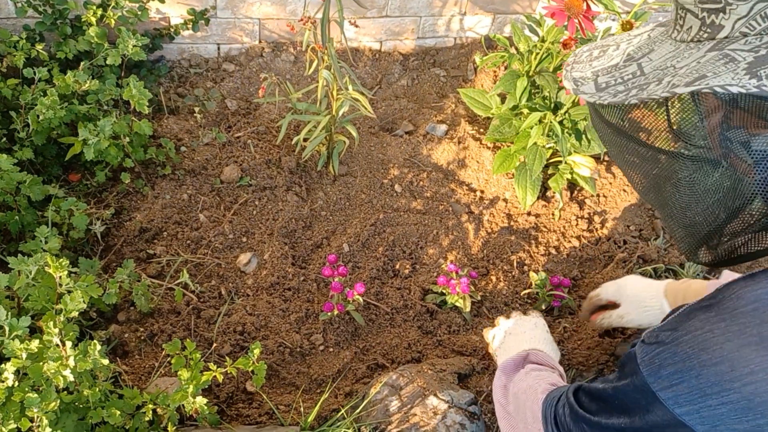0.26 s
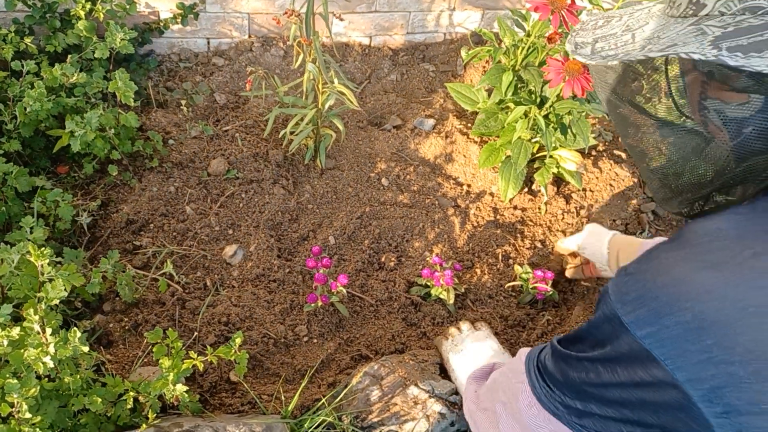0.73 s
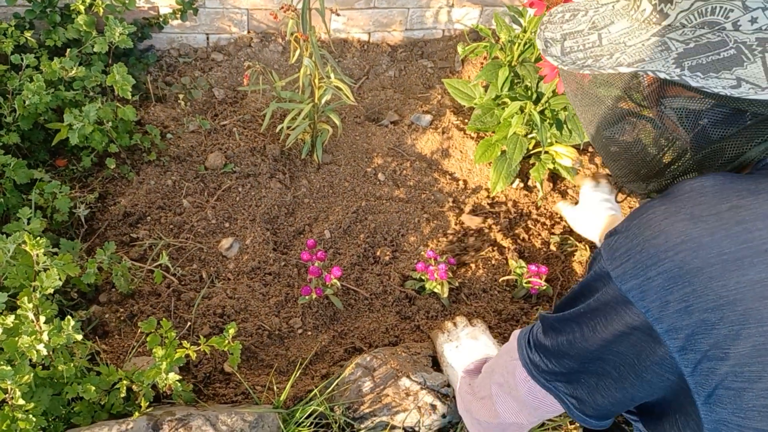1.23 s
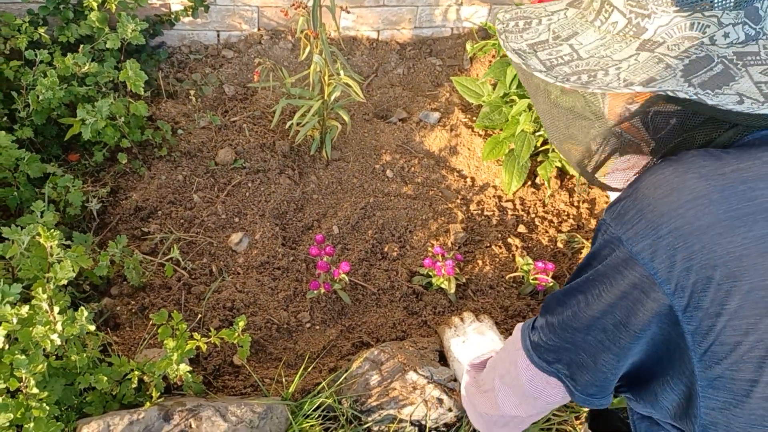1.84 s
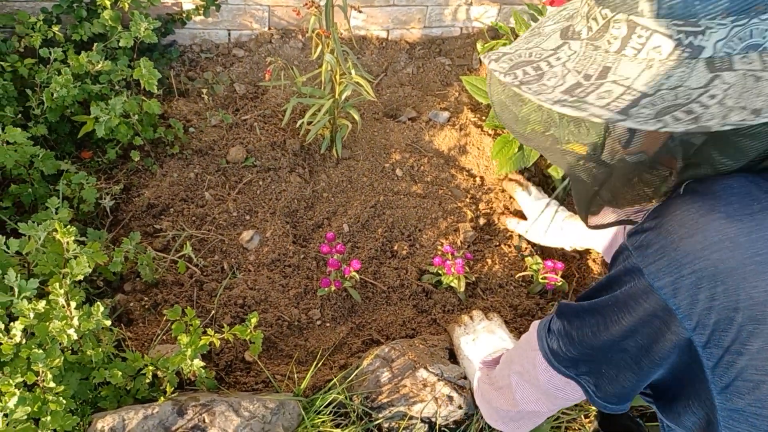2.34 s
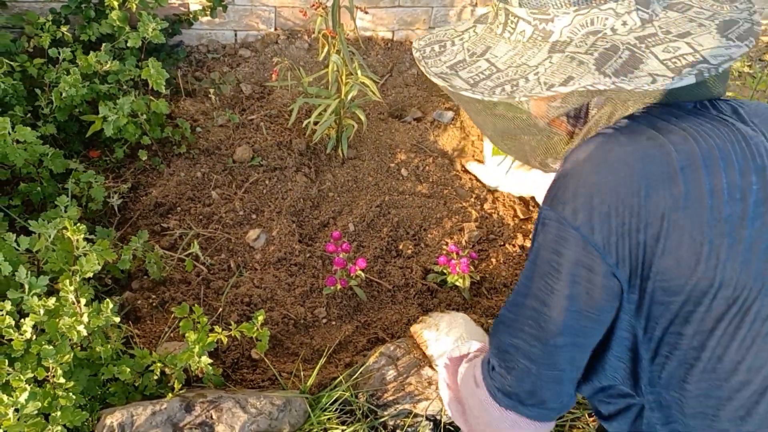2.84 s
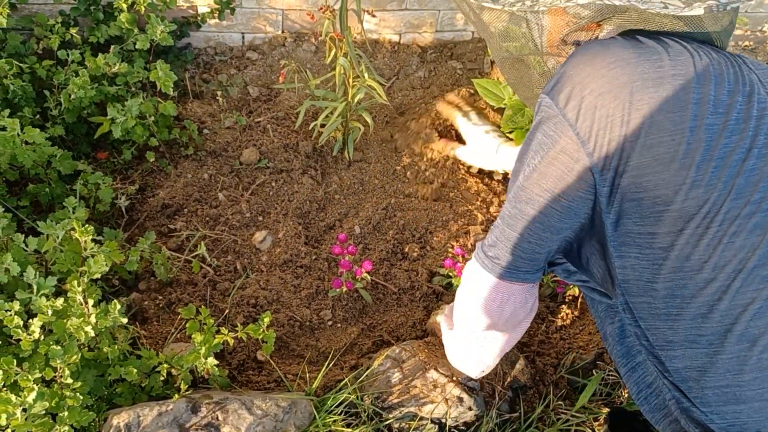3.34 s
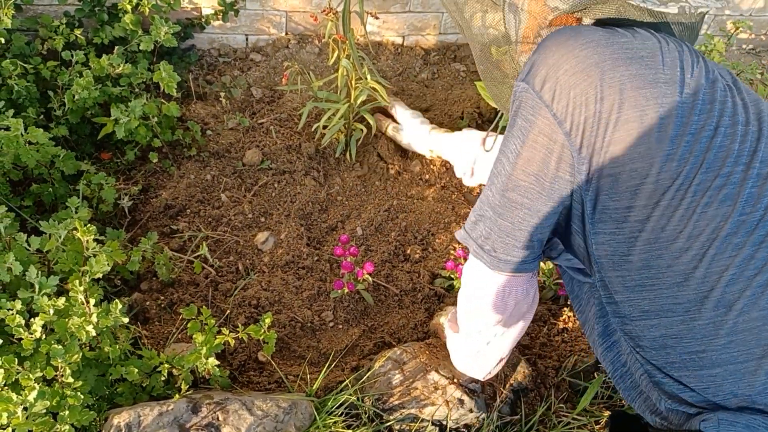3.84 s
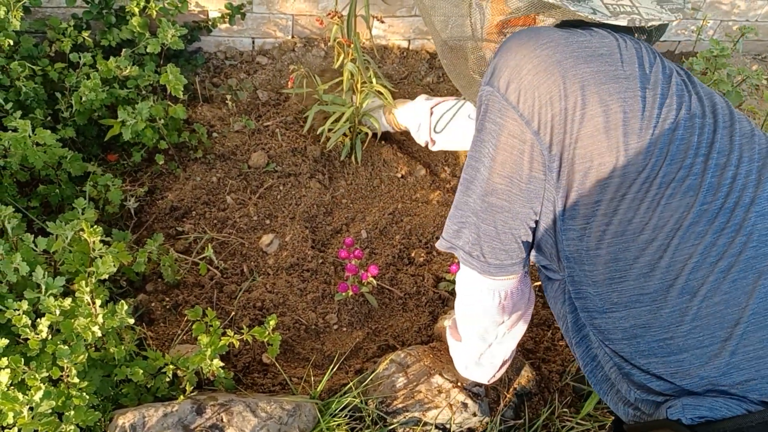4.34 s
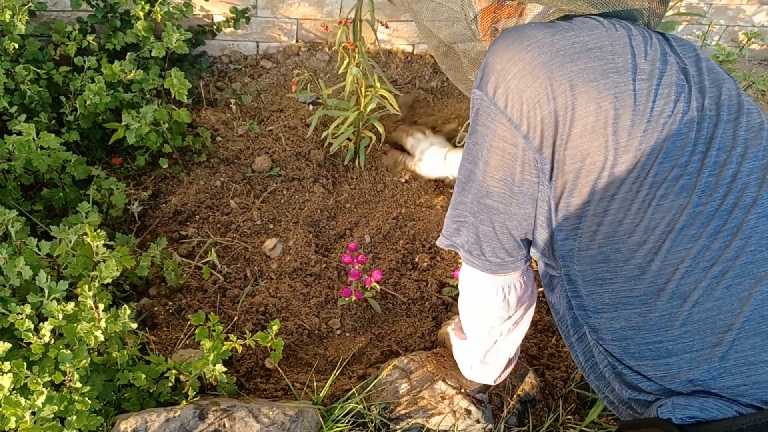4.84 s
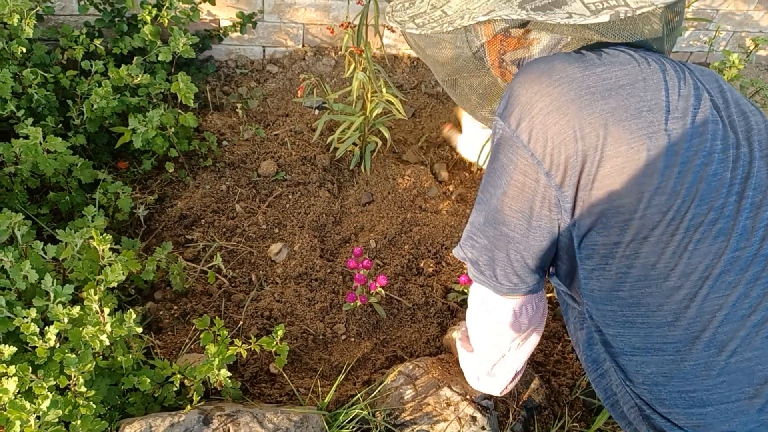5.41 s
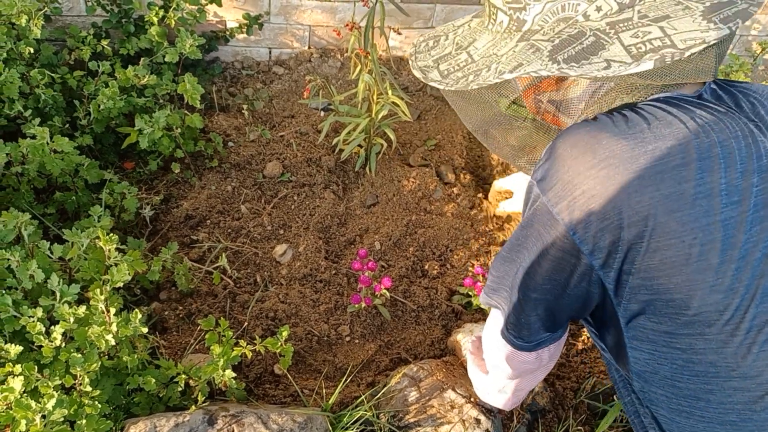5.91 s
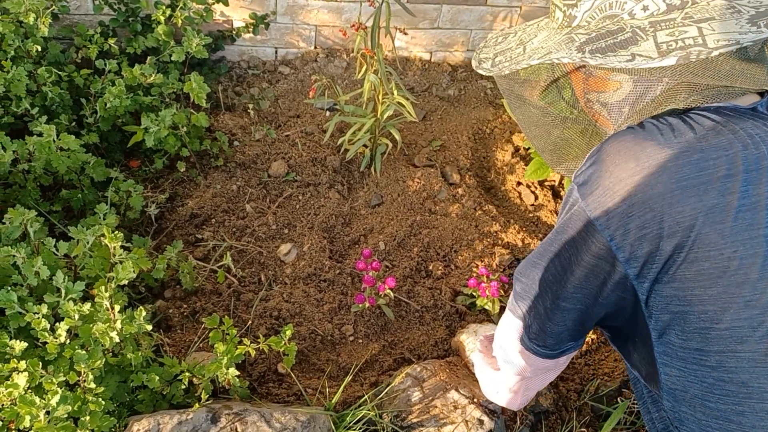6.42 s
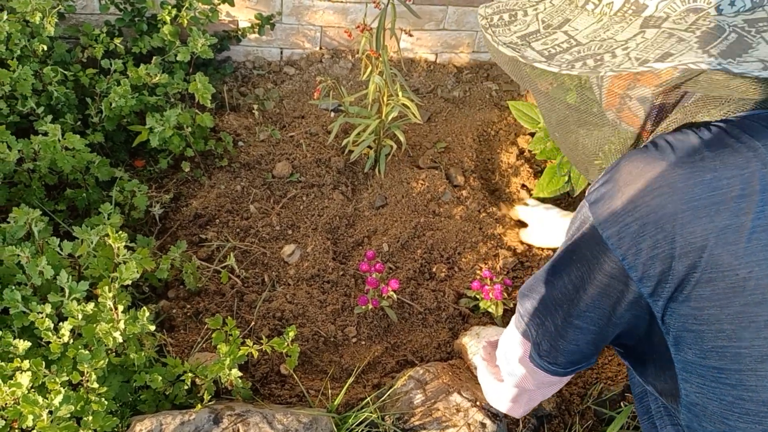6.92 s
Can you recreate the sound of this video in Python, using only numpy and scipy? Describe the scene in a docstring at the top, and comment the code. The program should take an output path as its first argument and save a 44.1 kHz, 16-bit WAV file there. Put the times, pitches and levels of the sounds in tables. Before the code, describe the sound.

Cows low in slow rising and falling moos, calves answer faintly, sparrows chirp, and gloved hands scuff dry soil while a tiny chain tinkles.

```python
"""Cattle shed by a garden bed

Near cows low in arched calls: vocal-fold harmonics pass through chest, mouth and upper throat resonances.
Far calves answer higher with four flickering harmonics; sparrows chirp in gliding, fluttering tones.
Hands scuff dry soil (noise split into grit and clods) and a small chain tinkles in decaying partials.
Late gusts of shaped noise and slapping bursts buffet mainly the right microphone port, over a soft farm bed.
"""
import sys
import numpy as np
from scipy import signal
from scipy.fft import rfft, irfft
from scipy.io import wavfile
from scipy.ndimage import uniform_filter1d

SR = 44100
rng = np.random.default_rng(int(sys.argv[2]) if len(sys.argv) > 2 else 0)


def natural_amplitude(level_db):
    """Convert a level in decibels to a linear amplitude factor, elementwise."""
    exponent = np.asarray(level_db, float) / 20
    return 10 ** exponent


def put_to_file(sound):
    """Save the sound as 16-bit audio at rate SR, in the file named by the first command-line argument."""
    columns = np.atleast_2d(sound).T  # one column per channel
    safe = np.clip(columns, -1, 1)
    whole_steps = np.round(safe * 32767)
    wavfile.write(sys.argv[1], SR, whole_steps.astype(np.int16))


N = 316197
T = np.arange(N) / SR


def level(x, db=0):
    """Scale to an rms level."""
    return x * natural_amplitude(db) / np.sqrt(np.mean(x ** 2))


def band_rms(x, low_hz, high_hz):
    """Rms of one band."""
    return np.std(signal.sosfilt(signal.butter(4, [low_hz, high_hz], "band", fs=SR, output="sos"), x))


def colour(x, shape):
    """Shape a spectrum by (frequency_hz, level_db) points, joined along log frequency."""
    hz, db = np.transpose(shape)
    f = np.maximum(np.arange(N // 2 + 1) * SR / N, 1)
    return irfft(rfft(x) * natural_amplitude(np.interp(np.log(f), np.log(hz), db)), N)


def walk(rate):
    """Random levels held 1 / rate s and slewed twice; spread near 1."""
    hold = max(int(SR / rate), 2)
    steps = np.repeat(rng.standard_normal(N // hold + 1), hold)
    return 1.393 * uniform_filter1d(uniform_filter1d(steps, hold), hold)[:N]


def play(table, fade=.02, start=0.):
    """Sample slice, fading gate and interpolated columns of one curve; fade and start in s."""
    s, *columns = np.transpose(table)
    s = s + start
    where = slice(max(int((s[0] - fade) * SR), 0), min(int((s[-1] + fade) * SR), N))
    t = T[where]
    gate = np.clip(np.minimum(t - s[0], s[-1] - t) / fade + 1, 0, 1)
    return where, gate, [np.interp(t, s, c) for c in columns]


def decay(t, t60_s):
    """Exponential fall of 60 dB in t60_s."""
    return np.exp(-np.log(1000) * t / t60_s)


# farm bed spectrum: frequency_hz, level_db (relative, per Hz)
FIELD_SPECTRUM = [(25, -30.5), (50, -14.5), (90, -5.5), (125, 8), (180, 0), (250, 3), (380, -11.5),
                  (800, -10), (1300, -26.5), (2000, -22.5), (2700, -69.5), (4000, -32), (6500, -24.5),
                  (14000, -36), (16000, -38)]


def field():
    """Distant farm rumble and air; left and right are most alike near 140 Hz, less in deep bass and treble."""
    side_re_mid = [(60, 2.0), (140, -16.0), (400, -6.0), (1200, -1.5), (16000, 2.5)]  # Hz, dB
    mid = colour(rng.standard_normal(N), FIELD_SPECTRUM)
    side = colour(colour(rng.standard_normal(N), FIELD_SPECTRUM), side_re_mid)
    bed = level(mid + side * np.array([[1], [-1]]), -68.5)
    return bed * natural_amplitude(2 * walk(2.725))  # slow swell


# wind, one curve a gust: start_s, level_db (before the port gain), small_eddies_db (re level_db)
GUSTS = [
    [(4.49, -78, -15), (4.522, -88, -15), (4.56, -87, -3)],
    [(5.38, -75, -7), (5.42, -47.5, -16), (5.45, -59, -13), (5.476, -48, -17), (5.52, -62.5, -4)],
    [(6.28, -99, 6), (6.312, -48.5, -35), (6.386, -41, -24), (6.456, -43, -6.5), (6.516, -65, 2),
     (6.604, -54, -3.5), (6.662, -68, -2), (6.685, -48.5, -6.5), (6.725, -37, -17), (6.753, -40.5, -20),
     (6.78, -50, -13), (6.81, -40, -10), (6.84, -59, -4), (6.87, -48.5, -13), (6.893, -48, -18),
     (6.945, -51, -22), (6.965, -35.5, 7.5), (7.011, -38, -20), (7.099, -36.5, -17), (7.141, -49.5, -24),
     (7.17, -32, -13)],
]
# single slaps: start_s, relative_level_db, pitch_hz (settled)
SLAPS = [(6.313, -36, 100), (6.344, -42, 99.6), (6.37, -26.5, 113), (6.399, -29.5, 129), (6.434, -32, 132),
         (6.467, -29.5, 72), (6.514, -41, 246), (6.584, -37.5, 145), (6.686, -26, 123), (6.707, -26.5, 122),
         (6.721, -26, 86.1), (6.8, -34, 150), (6.854, -29.5, 91.5), (6.911, -27.5, 154), (6.932, -33, 197),
         (6.954, -13.5, 122), (6.989, -34, 122), (7.032, -19, 107), (7.059, -24.5, 99), (7.085, -31.5, 174),
         (7.102, -19, 97), (7.158, -25.5, 123.5)]
# spectra of large and of small eddies: frequency_hz, level_db (relative, per Hz)
LARGE_EDDIES = [(25, -59), (50, -15), (72, 1), (115, 3.5), (170, -6.5), (300, -27.5), (2000, -110)]
SMALL_EDDIES = [(60, -24), (150, -6.5), (260, 6), (400, -10), (650, -31.5), (2000, -100)]
# gain of the left and right port: level_db
PORT_GAIN_DB = [-24, 9.5]


def wind():
    """Large and small eddies tumble unevenly over the ports; a few slap hard."""
    envelopes, slaps = np.zeros((2, N)), np.zeros(N + SR)
    t = np.arange(SR // 10) / SR
    for gust in GUSTS:
        where, gate, (db, small_db) = play(gust, fade=0.01)
        envelopes[:, where] = gate * natural_amplitude(np.array([db, db + small_db]))
    for s, db, hz in SLAPS:
        i = int(s * SR)
        # the slap starts tight and slows as the eddy passes
        phase = 2 * np.pi * hz * (t + 0.004 * (1 - np.exp(-t / 0.0039)))
        burst = (t / 0.0046) ** 2 * np.exp(-t / 0.0032)
        slaps[i:i + len(t)] += natural_amplitude(db + 3.5) * np.sin(phase) * burst
    # the vent behind the diaphragm lets the slowest pressure escape
    slaps = signal.sosfilt(signal.butter(3, 62, "high", fs=SR, output="sos"), slaps)[:N]
    tumble = natural_amplitude(2.5 * walk(60))
    ports = np.zeros((2, N))
    for port in ports:  # separate noise at each port
        for envelope, spectrum in zip(envelopes, (LARGE_EDDIES, SMALL_EDDIES)):
            port += envelope * level(colour(rng.standard_normal(N) * tumble, spectrum))
    ports += [np.roll(slaps, 21) * natural_amplitude(-7.0), slaps]  # slaps come later and softer on the left
    return ports * natural_amplitude(PORT_GAIN_DB)[:, None]


# far calves, one curve a call: start_s, pitch_hz, level_db, fourth_harmonic_db (re level_db)
CALF_CALLS = [
    [(.66, 412, -90, -2), (.71, 413, -72, -1), (.78, 414, -72, 1), (.86, 415, -67, -19),
     (.92, 417, -59, -23), (1.0, 421, -69, -22), (1.045, 421, -68, 2), (1.11, 419.8, -57, -16),
     (1.2, 422, -72.5, -3.5), (1.25, 422.4, -64, -15), (1.37, 422, -69.5, -11), (1.45, 420, -65.5, -10),
     (1.54, 409, -68.5, -6)],
    [(5.19, 393, -79, -24.5), (5.25, 400.3, -65, -36.5), (5.4, 411.7, -71.5, -23), (5.62, 410, -87, -13)],
    [(5.72, 418, -88, -4), (5.84, 428, -71, 0), (5.89, 439, -66, -8), (5.951, 446.4, -56.5, -13),
     (6.05, 459, -68, -12), (6.3, 448.6, -69, 1.5), (6.38, 449, -53.5, -12), (6.459, 441, -73, -14),
     (6.6, 425, -77, -8)],
]
# odd harmonics of each call: first_harmonic_db, third_harmonic_db (re level_db)
CALF_ODD = [(-24, -33), (-3.5, -4), (-33, -19)]


def calves():
    """Distance leaves only the lowest four harmonics, flickering; the odd ones sit below the second."""
    out = np.zeros(N)
    for call, (first_db, third_db) in zip(CALF_CALLS, CALF_ODD):
        where, gate, (hz, db, fourth_db) = play(call, fade=.03)
        phase = 2 * np.pi * np.cumsum(hz * (1 + 0.004 * walk(120)[where])) / SR
        for k, harmonic_db in enumerate((first_db, 0, third_db, fourth_db), 1):
            flicker_db = 1.8 * walk(60)[where]
            out[where] += gate * natural_amplitude(db + harmonic_db + flicker_db) * np.sin(k * phase)
    return out


def add_note(out, table, burr, start=0., db=0.):
    """One gliding bird note whose pitch (burr row 0, share) and level (row 1, dB) flutter."""
    where, gate, (hz, note_db) = play(table, fade=0.0065, start=start)
    flutter = np.roll(burr, rng.integers(N), axis=1)[:, where]
    phase = 2 * np.pi * np.cumsum(hz * (1 + flutter[0])) / SR
    out[where] += gate * natural_amplitude(note_db + db + flutter[1]) * np.sin(phase)


# near chirps: start_s, relative_level_db
CHIRPS = [(1.831, -47), (3.336, -46.5), (5.1831, -47.5), (6.956, -47.5)]
# the two parts of a near chirp: after_start_s, pitch_hz, level_db (re chirp)
CHIRP_PARTS = [
    [(0, 3860, -4), (.005, 4090, -10), (.014, 4584, 1), (.034, 4730, 2), (.046, 4940, -20),
     (.06, 4676, -32)],
    [(.034, 4127, -45), (.038, 3890, 0), (.048, 3614, 0), (.058, 3190, 3.5), (.07, 3270, -9.5),
     (.074, 3310, -21)],
]
# sparrows further off: start_s, length_s, relative_level_db, first_hz, last_hz (midway between two voices)
FLOCK = [(0.098, 0.09, -61.5, 4540, 3480), (0.46, 0.085, -66, 4370, 4505), (0.618, 0.14, -59.5, 4640, 3910),
         (1.347, 0.11, -62.5, 4630, 3660), (1.479, 0.086, -62.5, 4180, 4250),
         (1.623, 0.091, -58.5, 4360, 3790), (1.893, 0.045, -70, 3730, 4307),
         (2.046, 0.067, -57.5, 4340, 4420), (2.282, 0.095, -64, 4660, 4130),
         (2.443, 0.044, -66, 4363, 4680), (3.23, 0.1, -64.5, 4020, 4300), (3.656, 0.096, -63, 4410, 4278),
         (3.87, 0.15, -64.5, 3760, 3500), (4.154, 0.1, -71.5, 4020, 4060), (4.33, .11, -69, 4150, 4050),
         (4.525, 0.071, -71.5, 4320, 4520), (4.935, 0.075, -62, 4500, 3500),
         (5.452, 0.068, -62.5, 4500, 4210), (5.735, 0.079, -69.5, 4330, 3564),
         (6.039, 0.14, -63.5, 4610, 4100), (6.469, 0.079, -64.5, 4250, 4470),
         (7.11, 0.056, -70, 4640, 4580)]
# thin high notes: start_s, relative_level_db, pitch_hz (12 ms in)
PIPS = [(1.2256, -61.5, 5840), (1.3209, -61, 6270), (1.6302, -62, 6830), (1.867, -57.5, 5840),
        (2.4843, -59.5, 5920), (3.134, -63, 5670), (3.6775, -61, 5800), (3.7771, -63, 5960),
        (4.963, -61.5, 5450), (5.729, -62, 5747), (5.827, -64.5, 5915)]
# clear sweeps of single sparrows: start_s, length_s, relative_level_db, first_hz, middle_hz, last_hz
SWEEPS = [(0.688, 0.065, -57, 4340, 3520, 4370), (1.26, 0.024, -53.5, 4250, 4700, 5170),
          (1.357, 0.017, -59, 4680, 4860, 5100), (1.921, 0.026, -49.5, 3700, 4060, 4400),
          (2.488, .03, -55, 4200, 3830, 3760), (2.532, 0.021, -62, 3300, 3370, 3343),
          (3.154, 0.032, -55, 4000, 3850, 3783), (3.192, 0.021, -60.5, 3300, 3360, 4040),
          (3.658, 0.037, -63, 4520, 4300, 4200), (3.703, .02, -60, 3780, 4200, 4770),
          (3.944, 0.028, -64, 4100, 3700, 3400), (4.32, .05, -62, 4800, 4550, 4540),
          (4.374, .016, -63, 3640, 3860, 4100), (4.53, .06, -68, 4200, 4450, 4820),
          (4.599, 0.015, -70, 3620, 3550, 3500), (5.017, 0.015, -63, 3290, 3800, 4500),
          (5.045, .016, -65, 3450, 3400, 3370), (3.903, 0.022, -59, 4950, 5040, 4950),
          (4.974, 0.042, -62, 4500, 3700, 3280), (6.447, 0.067, -63, 3400, 3420, 3420)]


def sparrows():
    """Near burry chirps and clear single sweeps; the flock trills fast and wide, two voices to a chirp."""
    near, far = np.zeros(N), np.zeros(N)
    near_burr = np.array([0.055 * walk(900), 2.6 * walk(350)])
    far_burr = np.array([0.05 * walk(340), 5 * walk(220)])
    for s, db in CHIRPS:
        for part in CHIRP_PARTS:
            add_note(near, part, near_burr, s, db)
    peak, voice_shift = 0.42, 0.08  # share of the length; pitch share each voice lies off the middle
    for s, length, db, first_hz, last_hz in FLOCK:
        peak_hz = first_hz + peak * (last_hz - first_hz)
        note = np.array([(0, first_hz, -8), (peak * length, peak_hz, 0), (length, last_hz, -9)])
        for side in (-1, 1):
            add_note(far, note * [1, 1 + side * voice_shift, 1], far_burr, s, db)
    for s, db, hz in PIPS:
        note = [(0, .98 * hz, 4), (.012, hz, 2.5), (.03, 1.1 * hz, -16)]
        add_note(far, note, near_burr / 2, s, db)
    for s, length, db, *hz in SWEEPS:
        note = np.transpose([[0, length / 2, length], hz, [-3, 0, -3]])
        add_note(near, note, near_burr / 2.48, s, db)
    return near, far


# chain clinks: start_s, relative_level_db, link (name)
CLINKS = [(0.0753, -46.5, "clasp"), (0.221, -53, "small"), (0.361, -59, "clasp"), (0.486, -50.5, "clasp"),
          (0.535, -39.5, "clasp"), (0.5847, -45, "clasp"), (0.627, -44, "clasp"), (0.685, -48, "clasp"),
          (0.9494, -64.5, "middle"), (1.068, -55.5, "middle"), (1.1217, -53.5, "ring"),
          (1.1603, -55, "ring"), (1.187, -48, "large"), (1.249, -49.5, "large"), (1.325, -48.5, "large"),
          (1.445, -62, "large"), (1.5218, -60.5, "large"), (1.6305, -50.5, "large"),
          (1.7938, -54.5, "ring"), (1.9025, -58.5, "middle"), (2.036, -53, "ring"), (2.0948, -44, "small"),
          (2.167, -53, "small"), (2.25, -60, "small"), (2.298, -56.5, "small"), (2.382, -54.5, "small"),
          (2.4796, -57, "small"), (2.5263, -52.5, "small"), (6.7814, -61.5, "middle"),
          (6.868, -55.5, "middle"), (6.9494, -61, "middle"), (7.045, -56.5, "middle")]
# the links that strike, by name: lower_partial_hz, upper_partial_hz, upper_db (re lower)
LINKS = {"clasp": (11700, 15100, 0), "small": (11900, 13900, 1), "middle": (11100, 13100, -1),
         "large": (9800, 13000, 1), "ring": (9700, 14200, 2)}
# partials of the other links: pitch_hz
OTHER_LINKS_HZ = [10300, 10400, 10300, 11300, 12900, 11700, 11800, 12100, 13500, 12100, 13800, 14200, 14600,
                  15400]
# links rub as they strike: frequency_hz, level_db (relative, per Hz)
RASP_SPECTRUM = [(7500, -40), (9500, -6), (13000, 0), (15800, -2)]


def chain():
    """Each clink rings two strong partials over a short rasp, then neighbouring links rattle after it."""
    out, t = np.zeros(N + SR), np.arange(SR // 6) / SR
    rasp = level(colour(rng.standard_normal(N), RASP_SPECTRUM), -8)
    # six strikes a clink: the clink itself, then five rattles
    chances = rng.random((len(CLINKS), 6, 2 + len(OTHER_LINKS_HZ)))
    for (s, db, link), chance in zip(CLINKS, chances):
        low_hz, high_hz, high_db = LINKS[link]
        for k, (lag, size, *others) in enumerate(chance):
            rattle = k > 0
            detune = 1 + 0.048 * (size - .5) * rattle
            hz = np.array([low_hz, high_hz, *OTHER_LINKS_HZ]) * detune
            gain = natural_amplitude(np.array([0, high_db, *(-6 - 16 * np.array(others))]))
            start_phase = lag * gain[:, None] * 9
            strike = gain @ np.sin(2 * np.pi * (hz[:, None] * t + start_phase)) * decay(t, 0.066)
            i = int((s + 0.042 * lag * rattle) * SR)
            strike += np.resize(rasp[i:], len(t)) * decay(t, 0.1)
            fainter_db = (-4 - 9 * size) * rattle
            out[i:i + len(t)] += natural_amplitude(db + fainter_db) * strike * np.minimum(t / 0.0064, 1)
    return out[:N]


# hands stroke dry soil: peak_s, rise_s, fall_s (each spans STROKE_DB), grit_db, clods_db (relative)
STROKES = [(0.057, 0.6, 0.097, -64, -50.5), (.34, 0.25, 0.098, -75, -61), (.6, 0.093, 0.15, -76, -90),
           (.67, .08, 0.27, -77, -79), (.76, .2, 0.17, -74, -78), (0.815, 0.49, 0.063, -69.5, -73),
           (1.12, .02, .1, -79, -88), (1.19, 0.043, 0.33, -72.5, -83), (1.3, 0.078, 0.4, -80, -86),
           (1.53, 0.078, 0.07, -68.5, -84.5), (1.63, 0.036, 0.32, -84, -68), (1.74, 0.083, 1, -73.5, -61),
           (2.55, 2.07, 0.2, -73.5, -64.5), (2.67, 0.1, 0.1503, -67.5, -80.5),
           (2.81, 0.021, 0.078, -66, -74.5), (2.93, 0.2, 0.17, -62, -56), (2.996, 0.16, 0.11, -53, -47),
           (3.4, 0.32, 0.58, -70.5, -74), (3.67, 0.18, 0.2, -74.5, -69), (4.0, 0.023, 0.092, -81, -75.5),
           (4.14, 0.076, 0.29, -74.5, -78), (4.28, 0.32, 0.29, -74, -78), (4.86, 0.32, 0.22, -71.5, -75),
           (5.3, 0.086, 0.18, -68, -70.5), (5.82, 0.77, 0.34, -79.5, -71), (6.2, 0.14, 0.74, -76.5, -73),
           (6.4, 0.12, 0.2, -70.5, -59.5), (6.425, 0.051, 0.03, -89, -62), (6.91, 0.05, 0.15, -79, -69.5),
           (6.851, 0.15, 0.13, -65, -71.5), (6.99, 0.08, 0.24, -67.5, -71.5), (7.15, 0.17, 0.19, -83, -98)]
STROKE_DB = 21.5
# pebbles and twigs: start_s, relative_level_db, grit_db (re clods)
TICKS = [(.052, -52, -15), (0.7085, -65, -14), (0.805, -72, 13), (1.297, -63, -24), (1.7337, -62, -25),
         (2.7898, -63, -4), (2.9975, -34.5, -26), (3.0004, -39, -24), (3.0828, -47.5, -35),
         (4.831, -76, -2), (4.88, -72, 13), (6.803, -67, 9.5), (6.896, -67, -2), (7.1197, -69, 12)]
# dry soil spectrum: frequency_hz, level_db (relative, per Hz)
SOIL_SPECTRUM = [(410, -35), (700, -10.5), (1200, -11.5), (1900, -8.5), (2420, -9), (3020, -8.5),
                 (4710, -11.5), (6370, -15), (7850, -15.5), (15900, -17)]


def soil():
    """Fine grit hisses, heavier clods add the lower part, single pebbles tick."""
    power = np.zeros((2, N))
    power[0] = natural_amplitude(-84.5) ** 2  # grit trickles between strokes
    for s, rise, fall, *db in STROKES:
        drop_db = STROKE_DB * np.maximum((s - T) / rise, (T - s) / fall)
        power += natural_amplitude(np.array(db)[:, None] - drop_db) ** 2
    grains = rng.standard_normal((2, N)) * natural_amplitude(1.3 * walk(1200) + 2.3 * walk(60))
    grains = np.array([colour(g, SOIL_SPECTRUM) for g in grains])
    grains[1] = 0.038 * grains[0] + 1.097 * grains[1]  # left and right share little
    clods = signal.filtfilt(*signal.butter(2, 2800, fs=SR), grains)
    grit = grains - clods
    grit = grit / band_rms(grit[0], 6800, 8800)
    clods = clods / band_rms(clods[0], 1000, 4000)
    out = (np.sqrt(power[0]) * grit + np.sqrt(power[1]) * clods) * natural_amplitude(1.27 * walk(20))
    t = np.arange(SR // 50) / SR
    for s, db, grit_db in TICKS:
        now = slice(int(s * SR), int(s * SR) + len(t))
        tick = clods[:, now] + natural_amplitude(grit_db) * grit[:, now]
        out[:, now] += natural_amplitude(db) * tick * np.exp(-t / 0.0025)
    return out * natural_amplitude([[-1.5], [1.5]])  # louder on the right


def bump(f, hz, width_hz):
    """Gain of a steep resonance at frequency f."""
    return 1 / (1 + (2 * (f - hz) / width_hz) ** 2)


# near cows, one curve a call: start_s, pitch_hz, chest_db, mouth_db, mouth_resonance_hz
MOOS = [
    [(0, 182.4, -52, -50, 1020), (.1, 179.2, -55.5, -52, 1010), (.19, 174.7, -55.5, -52, 1020),
     (.25, 158.8, -52, -56, 850), (.29, 147, -51.5, -64, 835), (.37, 145.5, -53, -86, 810),
     (.45, 138, -88, -92, 722)],
    [(1.44, 146.6, -106.5, -69, 890), (1.56, 160.1, -53.5, -56, 1060), (1.716, 176.1, -55.5, -47.5, 980),
     (1.84, 181.3, -60.5, -49, 1040), (1.931, 187.8, -49, -48, 800), (2.07, 195.1, -49.5, -47, 785),
     (2.2, 197.1, -54.5, -48, 810), (2.396, 198.4, -46, -48, 830), (2.58, 194.5, -52.5, -46.5, 780),
     (2.68, 192.6, -50.5, -42.5, 771), (2.852, 187.9, -48.5, -52.5, 746), (2.89, 176.1, -51.5, -49, 950),
     (2.94, 161.8, -52.5, -53.5, 910), (3.02, 149.5, -47, -67, 997), (3.06, 148, -58, -75, 900),
     (3.087, 148, -44.5, -85, 848), (3.12, 143, -59, -79, 798), (3.22, 141, -78, -105, 700.5)],
    [(4.92, 110, -82, -99, 603), (5.03, 119.1, -59, -93, 630), (5.16, 124.8, -55.5, -83.5, 634),
     (5.24, 127.6, -66, -84, 650)],
    [(5.15, 122.5, -67, -96, 660), (5.23, 118.7, -52.5, -69, 670), (5.35, 110.6, -62.5, -69.5, 531),
     (5.47, 115.8, -81, -57.5, 526), (5.6, 120.8, -55, -55.5, 523), (5.731, 123.7, -44.5, -54.5, 576),
     (5.8, 125.4, -55.5, -57, 551.5), (5.86, 121.8, -45, -55.5, 530), (5.93, 114.1, -52.5, -65.5, 534),
     (5.98, 110, -60, -73, 530), (6.05, 114.5, -59.5, -83, 528), (6.12, 110.1, -77, -79, 522)],
    [(5.29, 138.7, -80, -73, 450), (5.36, 141.3, -69, -55, 476), (5.46, 144.6, -75, -55, 554),
     (5.53, 143, -74, -60, 577)],
]
# throat of each call: chest_hz (slack folds), upper_throat_hz, upper_throat_db (re mouth), odd_harmonics_db
THROATS = [(253, 1420, -1.5, -0.5), (281, 1350, -4, 0.5), (123, 850, 8, 3.5), (232, 800, -1.5, -8),
           (280, 750, -15, -7)]
# upper throat resonances: multiple (of upper_throat_hz), width_hz, level_db
UPPER_THROAT = [(0.999, 397, -5), (1.3, 296, -11.5), (1.72, 298, -22.5)]
# hoarseness of each call with slack folds: chest_share, mouth_share (0-1)
HOARSE_SLACK = [(.35, .15), (.4, .3), (.25, .4), (.1, .5), (.2, .1)]
HOARSE_TAUT = .035  # the same share with taut folds
# soft low noise that swells and fades with the mouth level: frequency_hz, level_db (relative, per Hz)
LOW_NOISE_SPECTRUM = [(30, -40), (60, -12), (130, 0.5), (230, 0), (400, -36)]
CLEAR_ABOVE_HZ, CLEARING_HZ = 169, 4.5  # pitch where hoarseness is half cleared, and how gradually
CHEST_WIDTH_HZ, MOUTH_WIDTH_HZ = 175, 215
CHEST_LIFT_HZ = 25  # the chest resonance rises as the folds tauten


def cows():
    """Harmonics of the vocal folds through chest, mouth and upper throat; hoarseness smears each line with noise."""
    out = np.zeros(N)
    low_noise = level(colour(rng.standard_normal(N), LOW_NOISE_SPECTRUM), -19)
    noise, waver = np.array([walk(150), walk(150)]), walk(9)
    for call, throat, slack in zip(MOOS, THROATS, HOARSE_SLACK):
        chest_hz, throat_hz, throat_db, odd_db = throat
        where, gate, (hz, chest_db, mouth_db, mouth_hz) = play(call, fade=.04)
        slackness = 1 / (1 + np.exp((hz - CLEAR_ABOVE_HZ) / CLEARING_HZ))
        hoarse = HOARSE_TAUT + (np.array(slack)[:, None] - HOARSE_TAUT) * slackness
        lifted_chest_hz = chest_hz + CHEST_LIFT_HZ * (1 - slackness)
        out[where] += gate * natural_amplitude(mouth_db) * low_noise[where]
        phase = 2 * np.pi * np.cumsum(hz * (1 + 0.002 * walk(25.03)[where])) / SR
        for k, shift in enumerate(rng.integers(N - 2 * SR, size=15), 1):
            own = slice(shift, shift + len(hz))  # own stretch of noise and waver
            upper = sum(natural_amplitude(db) * bump(k * hz, ratio * throat_hz, w) for ratio, w, db in UPPER_THROAT)
            chest = natural_amplitude(chest_db) * bump(k * hz, lifted_chest_hz, CHEST_WIDTH_HZ)
            mouth = natural_amplitude(mouth_db) * (bump(k * hz, mouth_hz, MOUTH_WIDTH_HZ) + natural_amplitude(throat_db) * upper)
            # each harmonic wavers in level on its own
            line = natural_amplitude(2.3 * waver[own]) * np.cos(k * phase + k * k)
            smear = noise[0, own] * np.cos(k * phase) + noise[1, own] * np.sin(k * phase)
            voice = np.sqrt(1 - hoarse) * line + np.sqrt(hoarse) * smear
            harmonic = np.sum(np.array([chest, mouth]) * voice, axis=0)
            out[where] += gate * natural_amplitude(odd_db * (k % 2)) * harmonic
    return out


def place(x, pan_db, lag):
    """Pan by left minus right level, and by the left port's lag in samples."""
    return np.array([np.roll(x, lag) * natural_amplitude(pan_db / 2), x * natural_amplitude(-pan_db / 2)])


# time for the yard echo to fall 60 dB: frequency_hz, decay_s
YARD_T60 = [(60, 0.57), (1000, 0.66), (5000, 0.31), (16000, 0.15)]


def yard(x, first_s=0.0026):
    """Scattered echoes off sheds and walls, another pattern at each port; the treble dies first."""
    hz, t, response = signal.stft(rng.standard_normal((2, SR)), SR, nperseg=256)
    t60 = np.interp(hz, *np.transpose(YARD_T60))
    response = signal.istft(response * decay(t, t60[:, None]), SR, nperseg=256)[1]
    response *= np.clip(np.arange(response.shape[1]) / SR / first_s, 0, 1)
    response /= np.sqrt(np.sum(response ** 2, axis=1, keepdims=True))
    return signal.fftconvolve(x[None], response, axes=1)[:, :N]


def scene():
    """Animals sound direct and off the shed walls; hands, chain and wind are close."""
    herd, young, (near, far), links = cows(), calves(), sparrows(), chain()
    echo_send = herd * natural_amplitude(-10.5) + young * natural_amplitude(-6)
    echo_send += near * natural_amplitude(-8.5) + far * natural_amplitude(-5.0) + links * natural_amplitude(-1.0)
    animals = place(herd, 0.066, lag=-8) + place(young, 0.11, lag=-2)
    animals += place(near, -0.74, lag=-3) + place(far * natural_amplitude(-5.0), -10.0, lag=-2)
    close = soil() + place(links * natural_amplitude(1.0), -7.5, lag=-2) + wind()
    return animals + yard(echo_send) + close + field()


def low_pass(x):
    """Removes everything above the highest recorded frequency."""
    return signal.sosfilt(signal.butter(12, 15850, fs=SR, output="sos"), x)


# the microphone port is deaf in a narrow band: frequency_hz, level_db
PORT_DIP = [(2300, 0), (2850, -11), (3350, 0)]


def record(dry):
    """The microphone port dips one narrow band of the mix."""
    mix = colour(dry, PORT_DIP)
    return low_pass(mix)


dry = scene()
out = record(dry)
put_to_file(out)
```